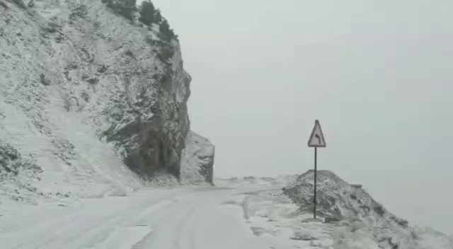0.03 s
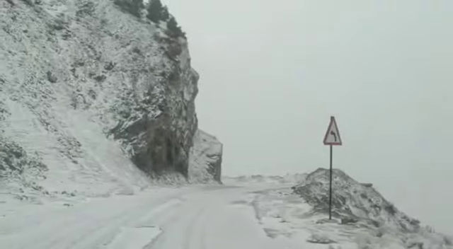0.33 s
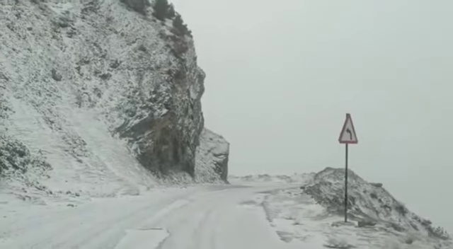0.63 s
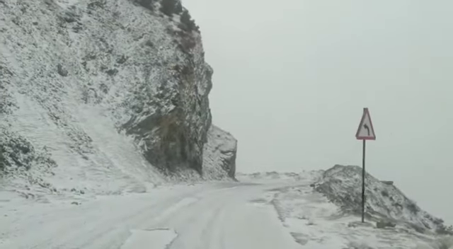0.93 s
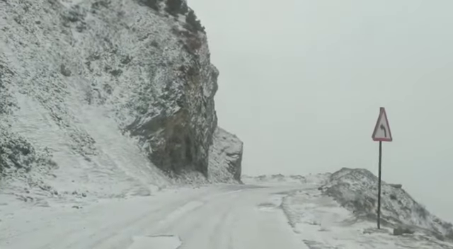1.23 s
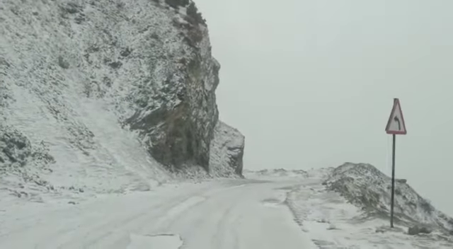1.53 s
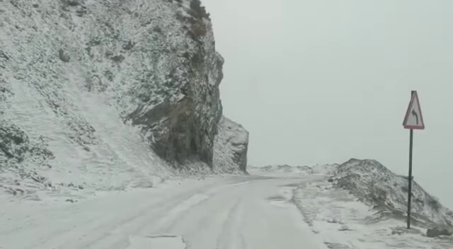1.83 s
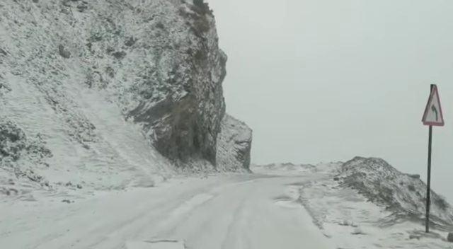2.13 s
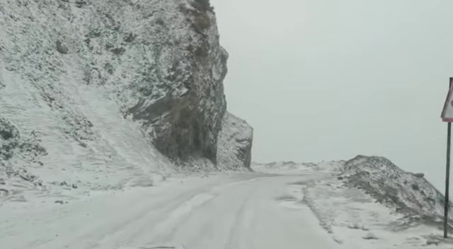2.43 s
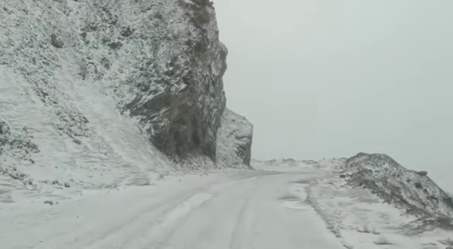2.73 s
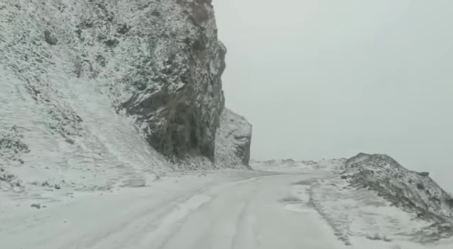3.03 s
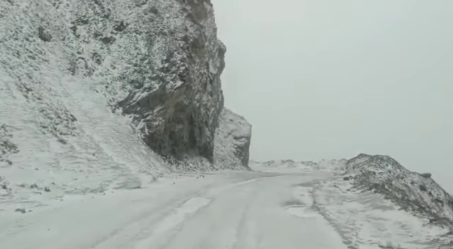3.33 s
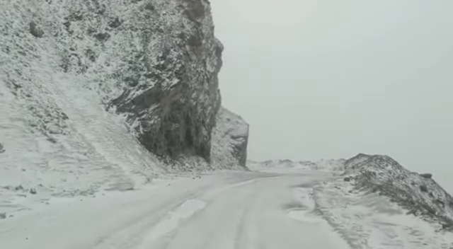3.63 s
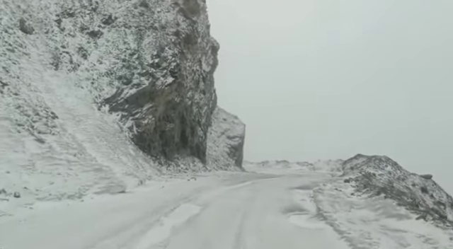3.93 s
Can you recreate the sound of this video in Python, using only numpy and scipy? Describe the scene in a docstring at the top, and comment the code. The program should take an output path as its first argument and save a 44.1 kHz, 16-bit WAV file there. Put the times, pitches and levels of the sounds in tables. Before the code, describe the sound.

A vehicle rumbles steadily over crunching snow, heard from inside the cab.

```python
"""Inside the cab of a vehicle creeping along a snowy mountain road.
From the start a four-cylinder engine drones at a steady speed, its moving parts chirping faintly in
every cycle, while the tyres rumble through the body and crunch on snow. From 0.2 s on the snow ticks
and bumps set the cab's air booming; small hard parts ring under a few early ticks. The trim creaks
at 1.25 s, knocks once at 2 s, creaks again at 2.6 s and three more times near the end."""
import sys
import numpy as np
from scipy import signal
from scipy.fft import rfft, irfft
from scipy.io import wavfile
from scipy.ndimage import uniform_filter1d

SR = 44100
rng = np.random.default_rng(int(sys.argv[2]) if len(sys.argv) > 2 else 0)


def file_out(sig):
    """Save sig as 16-bit WAV at sys.argv[1]."""
    # one column per channel
    cols = np.atleast_2d(sig).T
    # limit, then scale
    lim = np.clip(cols, -1, 1)
    pcm = np.round(lim * 32767).astype(np.int16)
    wavfile.write(sys.argv[1], SR, pcm)


N = 176400
T = np.arange(N) / SR
START_S, CUTOFF_HZ = .083, 15800

# Engine speed. Each row: time in seconds, firings per second.
FIRING_RATE_HZ = [(0, 51.98), (1, 52.1), (2, 52.13), (3, 52.05), (4, 51.87)]
# Drone partials. Each row: multiple of the cycle rate, level in dB, left over right in dB.
ENGINE_ORDERS = [(2, -49, 0), (4, -31.5, 0), (6, -56, 0), (8, -45, 1), (9, -57, 1), (12, -49, 0),
                 (14, -61, 2), (19, -65, -1), (28, -67, -4), (38, -65, 0), (43, -62.5, 4), (54, -70, 0),
                 (62, -70, 0), (90, -72, -2), (140, -80, -3)]
# Drone envelope. Each row: time in seconds, relative level in dB.
DRONE_LEVEL_DB = [(.12, 3), (.3, -2), (.39, 1), (.45, -2), (.65, -0.5), (.92, -0.5), (1.13, -4),
                  (1.3, -0.5), (1.88, -0.5), (1.97, -4), (2.15, 0), (2.35, -0.5), (2.6, 1), (3.03, 1.5),
                  (3.15, 0.5), (3.68, -2), (3.79, 2), (4, -4)]
CYLINDERS = 4
WAVER_BASE, WAVER_PER_ORDER, WAVER_MAX = .017, .021, 1
# Engine chirps. Each row: start as a fraction of the cycle, length in seconds,
# first and last pitch in Hz, level in dB.
ENGINE_CHIRPS = [(.12, .016, 1160, 1180, -63), (.33, .037, 1290, 1130, -54.7), (.42, .012, 1850, 1810, -70),
                 (.42, .012, 2850, 2800, -73), (.68, .016, 2840, 2700, -74), (.77, .013, 620, 530, -57),
                 (.77, .018, 1110, 1210, -65), (.88, .016, 1880, 1980, -66), (.89, .011, 2460, 2440, -67),
                 (.98, .014, 2380, 2290, -71)]
CHIRP_SPREAD_DB, CHIRP_JITTER_S, CHIRP_DETUNE = .9, .001, .005
CHIRP_PAN_DB, CHIRP_PHASE_SPREAD_RAD, CHIRP_ROUGHNESS = -2.5, .52, .1

# Cab stereo width. Each row: frequency in Hz, left-right correlation.
CAB_CORRELATION = [(30, 0.92), (110, 0.97), (180, 0.84), (280, 0.61), (550, 0.45), (900, 0.25),
                   (1500, -0.42), (3000, 0.013), (15000, -0.13)]
# Cab balance. Each row: frequency in Hz, left over right in dB.
CAB_BALANCE_DB = [(50, 1), (120, 2.5), (200, -1), (260, 2), (380, -7), (550, 3.5), (750, -1.5),
                  (1200, -1.5), (1900, -5), (2400, -6.5), (4000, -4), (5800, -10.5), (7000, 1), (9000, 3),
                  (12000, 2.5), (15000, -4.5)]

# Noise spectra. Each row: frequency in Hz, relative density in dB.
ROAD_SPECTRUM = [(10, -15.5), (22, -2.5), (40, -7), (65, -2), (85, -9), (140, -5), (200, -13), (235, -15),
                 (300, -18.5), (370, -17), (445, -22), (500, -20), (600, -20.5), (750, -27.5), (1000, -29),
                 (1200, -26.5), (1380, -32.5), (2200, -33.5), (2800, -43), (4300, -42), (5300, -46.5),
                 (6300, -46.5), (7300, -54), (8700, -61.5), (11500, -57.5), (15500, -55.5)]
SHUDDER_SPECTRUM = [(8, -20), (17, -4), (26, -13), (40, -8.5), (62, -7), (85, -13.5), (130, -35),
                    (400, -98)]
BOOM_SPECTRUM = [(50, -32.5), (90, -24), (125, 3), (158, -1), (190, 0.5), (230, -27.5), (400, -19.5),
                 (2000, -80)]
ROAR_SPECTRUM = [(250, -38), (480, 2), (580, 4), (780, 2.5), (1050, -6), (1400, -12), (3000, -44)]
SNOW_SPECTRUM = [(300, -46), (900, -17), (2000, 5.5), (2900, 1), (3600, 1), (4270, 6), (4700, 1.5),
                 (5150, 4), (5500, -1.5), (5920, 5), (6600, 1.5), (7150, -11), (7550, -9.5), (8300, -15.5),
                 (11500, -10.5), (15500, -24.5)]
KNOCK_SPECTRUM = [(200, -4), (600, 6), (1000, 1), (1500, 2), (2200, -8), (3500, -19), (9000, -44)]
ROAD_DB, ROAD_PATCH_DB, ROAD_FLICKER_DB = -39.5, 1.6, 1.0
# Envelopes of body shudder, body boom and tyre roar. Each row: time in seconds, level in dB.
SHUDDER_LEVEL_DB = [(0, -63), (1, -41), (1.8, -45), (2.5, -42), (3.1, -36), (3.5, -37), (4, -40)]
BOOM_LEVEL_DB = [(.1, -45), (.33, -65), (.46, -50), (.67, -40.5), (.83, -62), (.97, -36), (1.15, -49),
                 (1.4, -42.5), (1.9, -44), (2.04, -42.5), (2.21, -47.5), (2.7, -42), (2.95, -42.5),
                 (3.2, -41.5), (3.47, -38.5), (3.63, -69), (3.8, -41.5), (4, -51.5)]
ROAR_LEVEL_DB = [(.1, -58.5), (.47, -60.5), (.67, -60), (.8, -64), (1.15, -62.5), (1.35, -51.5),
                 (1.48, -67), (1.67, -55.5), (1.9, -57), (2.05, -57.5), (2.35, -59.5), (2.65, -55.5),
                 (2.92, -60), (3.3, -61), (3.42, -52.5), (3.6, -55), (3.9, -54), (4, -50.5)]

# Snow ticks. Each row: start in seconds, level in dB, treble lift in dB, attack in seconds.
SNOW_TICKS = [(.17, -61, 6, .006), (.2845, -52, 1, .002), (.4572, -48, -3, .0015), (.521, -55, -7, .005),
              (.543, -51, 0, .005), (.627, -56, 12, .007), (.6957, -55.5, -6, .001), (.725, -59, 5, .008),
              (.8665, -54, -3, .001), (1.1187, -60, -5, .001), (1.1586, -61, -4, .001),
              (1.1997, -55, -3, .001), (1.337, -57, 7, .008), (1.4925, -51, -7, .001),
              (1.8337, -54, -4, .001), (1.9609, -55.5, -2, .001), (1.995, -55, 2, .005),
              (2.018, -56, 1, .005), (2.0423, -52, 1, .002), (2.051, -52, 0, .005), (2.1475, -53, 2, .003),
              (2.2564, -57, 6, .004), (2.4578, -55, -2, .001), (2.724, -63, 19, .009),
              (2.755, -60, 3, .004), (2.8025, -54.5, 3, .003), (2.815, -57, 4, .005),
              (3.182, -61, 11, .007), (3.392, -56, 5, .007), (3.477, -55, 3, .004), (3.497, -56, 3, .004),
              (3.795, -54, 5, .006), (3.823, -55, -5, .004)]
TICK_T60_S, TICK_GRAININESS, TICK_SHELF_HZ = .085, .35, 8000
SNAP_DB, SNAP_S = 7, .003
CRUNCH_PER_S, CRUNCH_DB, CRUNCH_SPREAD_DB, CRUNCH_T60_S = 75, -70.5, -2, .06

# Road bumps. Each row: start in seconds, level in dB, pitch of the push in Hz.
ROAD_BUMPS = [(.18, -36, 135), (.95, -31.5, 155), (1.23, -37.5, 157), (1.31, -38, 128), (1.54, -38, 112),
              (1.62, -38, 160), (2.01, -29, 133), (2.625, -32, 150), (2.7, -34, 144), (3.08, -34, 144),
              (3.41, -38, 150), (3.735, -32, 157)]
# Cab air modes. Each row: frequency in Hz, relative level in dB, T60 in seconds.
CAB_AIR_MODES = [(112, 0, .25), (130, 0, .32), (144, -1, .38), (156, 0, .38), (182, 1, .3)]
BUMP_RISE_S, BUMP_DETUNE, BUMP_FALLOFF_DB_PER_HZ = .025, .01, .35

# Tiny metallic rings. Each row: start in seconds, pitch in Hz, level in dB.
METAL_TINKS = [(.2845, 7650, -59), (.4572, 7480, -62), (.628, 7700, -65), (.631, 9500, -62)]
TINK_RISE_S, TINK_T60_S, TINK_ROUGHNESS = .002, .11, .5

# Trim creaks. Each row: start and length in seconds, first and last pitch in Hz,
# bandwidth in Hz, level in dB.
TRIM_CREAKS = [(1.25, .04, 1800, 1750, 200, -64), (2.648, .045, 2580, 2640, 220, -63),
               (3.51, .05, 2100, 2000, 700, -57.5), (3.735, .075, 2100, 1500, 650, -54.5),
               (3.9, .04, 1560, 1620, 200, -52)]
CREAK_PAN_DB = -4.0
KNOCK_START_S, KNOCK_DB, KNOCK_RISE_S, KNOCK_T60_S = 2.0415, -41, .001, .09


def amp(db):
    """Decibels to gain."""
    return 10 ** (np.asarray(db) / 20)


def unit(x):
    """Scales to rms 1."""
    return x / np.sqrt(np.mean(abs(x) ** 2) + 1e-20)


def at_hz(table, hz):
    """Interpolates a table over log frequency."""
    table_hz, values = np.transpose(table)
    return np.interp(np.log(hz + 1), np.log(table_hz + 1), values)


def over_time(table):
    """Interpolates a table at every sample."""
    return np.interp(T, *np.transpose(table))


def pan(db):
    """Stereo gains for left over right in dB."""
    half_db = np.atleast_1d(db) / 2
    gains = amp([half_db, -half_db])
    return gains / np.sqrt((gains ** 2).mean(0))


def add(mix, start_s, sound):
    """Mixes in a stereo sound."""
    part = mix[:, max(round(start_s * SR), 0):][:, :sound.shape[1]]
    part += sound[:, :part.shape[1]]


def drift(rate_hz, size):
    """Complex low-pass noise, rms 1."""
    white = rng.standard_normal((size, 2)) @ [1, 1j]
    lowpass = np.exp(-.5 * (np.fft.fftfreq(size, 1 / SR) / rate_hz) ** 2)
    return unit(np.fft.ifft(white * lowpass))


def colour(white, spectrum):
    """Gives white stereo sound a spectrum and the cab's stereo image at equal power."""
    hz = np.fft.rfftfreq(N, 1 / SR)
    left, other = rfft(white)
    correlation = np.clip(at_hz(CAB_CORRELATION, hz), -1, 1)
    right = correlation * left + np.sqrt(1 - correlation ** 2) * other
    stereo = np.array([left, right]) * pan(at_hz(CAB_BALANCE_DB, hz))
    return irfft(stereo * unit(amp(at_hz(spectrum, hz))), N)


def engine_drone(cycles):
    """Engine orders, led by the firing rate; higher ones waver more."""
    out = np.zeros((2, N))
    for order, db, pan_db in ENGINE_ORDERS:
        waver = min(WAVER_BASE + WAVER_PER_ORDER * order, WAVER_MAX)
        tone = np.exp(2j * np.pi * (order * cycles + rng.random()))
        tone *= 1 + waver * drift(rate_hz=3, size=N)
        out += amp(db) * pan(pan_db) * unit(tone.real)
    return out * unit(amp(over_time(DRONE_LEVEL_DB)))


def engine_chirps(cycles):
    """Moving parts squeak in short glides at the same points of each cycle."""
    out = np.zeros((2, N))
    for place, length_s, first_hz, last_hz, db in ENGINE_CHIRPS:
        progress = np.linspace(0, 1, int(length_s * SR))
        glide_hz = first_hz + (last_hz - first_hz) * progress
        for start_s in np.interp(np.arange(int(cycles[-1])) + place, cycles, T):
            loud, late, sharp, left, right = rng.standard_normal(5)
            turns = np.cumsum(glide_hz) * (1 + CHIRP_DETUNE * sharp) / SR + rng.random()
            tone = np.sin(2 * np.pi * turns + CHIRP_PHASE_SPREAD_RAD * np.array([[left], [right]]))
            envelope = amp(db + CHIRP_SPREAD_DB * loud) * np.sin(np.pi * progress)
            add(out, start_s + CHIRP_JITTER_S * late, envelope * tone)
    return out * pan(CHIRP_PAN_DB) * (1 + CHIRP_ROUGHNESS * drift(rate_hz=150, size=N).real)


def road_noise():
    """Steady tyre and engine noise through the body, with drifting patches and slight flicker."""
    spectrogram = signal.stft(rng.standard_normal((2, N)), nperseg=512)[2]
    bins, frames = spectrogram.shape[1:]
    patches = uniform_filter1d(rng.standard_normal((bins, frames)), size=7, axis=0)
    patches = unit(uniform_filter1d(patches, size=7, axis=1))
    flicker = unit(uniform_filter1d(rng.standard_normal(frames), size=5))
    gain = amp(ROAD_PATCH_DB * patches + ROAD_FLICKER_DB * flicker)
    noise = signal.istft(spectrogram * gain, nperseg=512)[1][:, :N]
    return amp(ROAD_DB) * colour(unit(noise), ROAD_SPECTRUM)


def road_swell(spectrum, level_db):
    """One band of road noise, swelling as the wheels meet ruts and snow."""
    return amp(over_time(level_db)) * colour(rng.standard_normal((2, N)), spectrum)


def snow_crunch():
    """Snow under the tyres: many faint, decaying ticks at random times."""
    sizes = amp(CRUNCH_SPREAD_DB * np.minimum(rng.exponential(1, N), 3))
    onsets = rng.random(N) < CRUNCH_PER_S / SR
    power_decay = amp(-60 / (CRUNCH_T60_S * SR)) ** 2
    power = signal.lfilter([1], [1, -power_decay], (sizes * onsets) ** 2)
    grains = unit(np.sqrt(power) * rng.standard_normal((2, N)))
    return amp(CRUNCH_DB) * colour(grains, SNOW_SPECTRUM)


def snow_ticks():
    """A snap, then grains dying away in the cab; a slow attack softens it to a crunch."""
    out, t = np.zeros((2, N)), np.arange(8192) / SR
    hz = np.fft.rfftfreq(len(t), 1 / SR)
    shelf = 1 / (1 + (TICK_SHELF_HZ / (hz + 1)) ** 8)
    decay = amp(SNAP_DB * np.exp(-(t / SNAP_S) ** 2) - 60 * t / TICK_T60_S)
    for start_s, db, lift_db, attack_s in SNOW_TICKS:
        envelope = np.minimum(t / attack_s, 1) * decay
        noise = rng.standard_normal((2, len(t)))
        grains = unit(noise * np.exp(TICK_GRAININESS * drift(rate_hz=200, size=len(t)).real))
        shelved = irfft(rfft(grains) * amp(lift_db * shelf))
        add(out, start_s, amp(db) * envelope * shelved)
    return colour(out, SNOW_SPECTRUM)


def road_bumps():
    """Each bump pushes the body softly and rings the cab's air modes, most those near its pitch."""
    out, t = np.zeros((2, N)), np.arange(SR // 2) / SR
    push = np.sin(np.pi / 2 * np.minimum(t / BUMP_RISE_S, 1)) ** 2
    for start_s, db, push_hz in ROAD_BUMPS:
        for mode_hz, mode_db, t60_s in CAB_AIR_MODES:
            detuned_hz = mode_hz * (1 + BUMP_DETUNE * rng.standard_normal())
            ring = np.sin(2 * np.pi * (detuned_hz * t + rng.random()))
            level_db = db + mode_db - BUMP_FALLOFF_DB_PER_HZ * abs(mode_hz - push_hz)
            decay_db = 60 * np.maximum(t - BUMP_RISE_S, 0) / t60_s
            add(out, start_s, pan(0) * amp(level_db - decay_db) * push * ring)
    return out


def metal_tinks():
    """Small hard parts ring briefly under some ticks."""
    out, t = np.zeros((2, N)), np.arange(8192) / SR
    envelope = np.minimum(t / TINK_RISE_S, 1) * amp(-60 * t / TINK_T60_S)
    for start_s, hz, db in METAL_TINKS:
        ring = np.sin(2 * np.pi * (hz * t + rng.random()))
        ring *= 1 + TINK_ROUGHNESS * drift(rate_hz=200, size=len(t)).real
        add(out, start_s, amp(db) * pan(at_hz(CAB_BALANCE_DB, hz)) * envelope * ring)
    return out


def trim_creaks():
    """Brief rubbing in one gliding resonance of the trim."""
    out = np.zeros((2, N))
    for start_s, length_s, first_hz, last_hz, width_hz, db in TRIM_CREAKS:
        progress = np.linspace(0, 1, int(length_s * SR))
        glide_hz = first_hz + (last_hz - first_hz) * progress
        carrier = np.exp(2j * np.pi * np.cumsum(glide_hz) / SR)
        rub = np.array([drift(width_hz / 2, size=8192)[:len(progress)] for side in range(2)])
        add(out, start_s, amp(db) * np.sin(np.pi * progress) * unit((rub * carrier).real))
    return out * pan(CREAK_PAN_DB)


def trim_knock():
    """Loose trim knocks once, dully, on a bump."""
    t = np.maximum(T - KNOCK_START_S, 0)
    envelope = np.minimum(t / KNOCK_RISE_S, 1) * amp(KNOCK_DB - 60 * t / KNOCK_T60_S)
    return envelope * colour(rng.standard_normal((2, N)), KNOCK_SPECTRUM)


def scene():
    """Engine, road, snow and trim, heard in the cab."""
    cycles = .24 + np.cumsum(over_time(FIRING_RATE_HZ)) / CYLINDERS / SR
    shudder = road_swell(SHUDDER_SPECTRUM, SHUDDER_LEVEL_DB)
    boom = road_swell(BOOM_SPECTRUM, BOOM_LEVEL_DB)
    roar = road_swell(ROAR_SPECTRUM, ROAR_LEVEL_DB)
    engine = engine_drone(cycles) + engine_chirps(cycles)
    road = road_noise() + shudder + boom + roar + road_bumps()
    return engine + road + snow_ticks() + metal_tinks() + snow_crunch() + trim_knock() + trim_creaks()


def record(dry):
    """Cuts in and out over 3 ms, then low-passes."""
    gate = np.clip(np.minimum(T - START_S, T[-1] - T) / .003, 0, 1)
    lowpass = signal.firwin(511, CUTOFF_HZ, window=("kaiser", 9), fs=SR)
    return signal.oaconvolve(dry * gate, lowpass[None], "same")


dry = scene()
out = record(dry)
file_out(out)
```